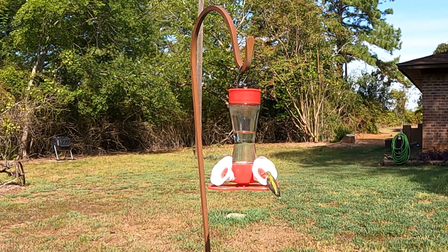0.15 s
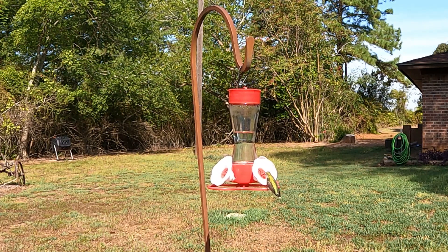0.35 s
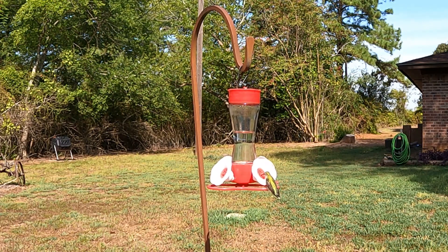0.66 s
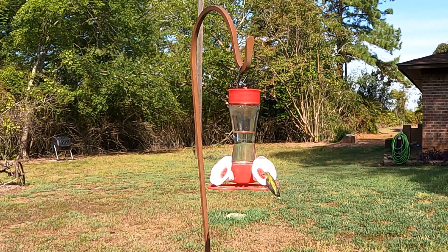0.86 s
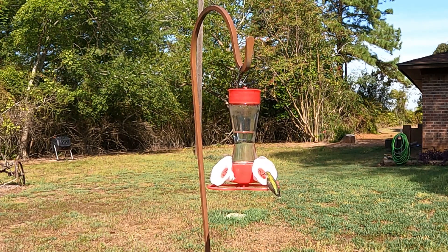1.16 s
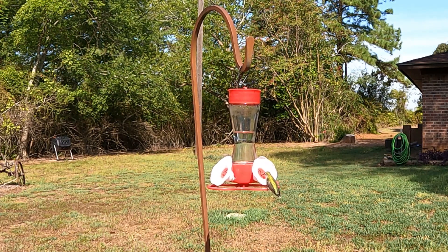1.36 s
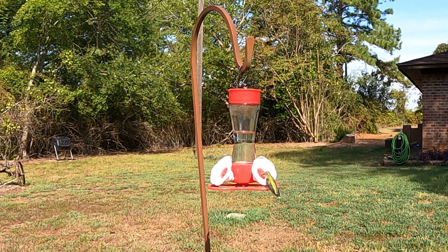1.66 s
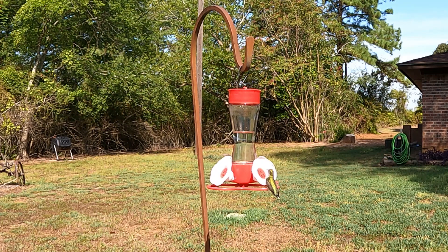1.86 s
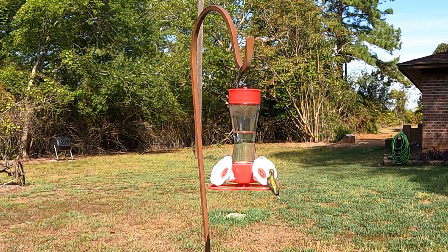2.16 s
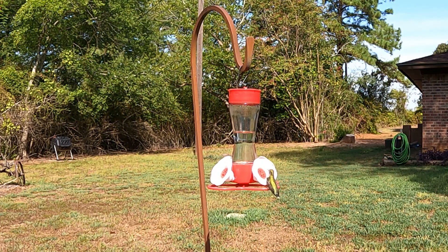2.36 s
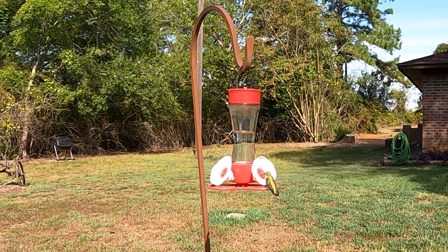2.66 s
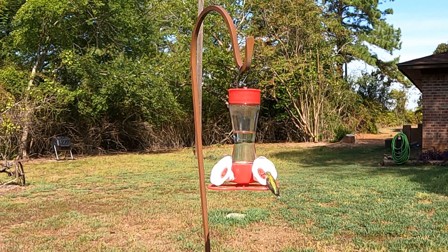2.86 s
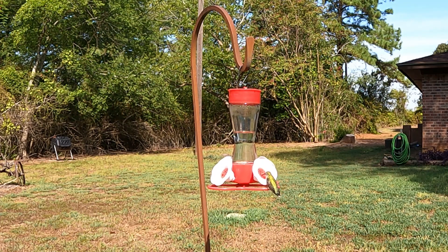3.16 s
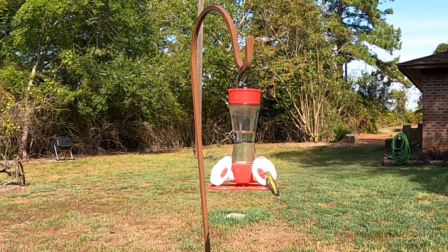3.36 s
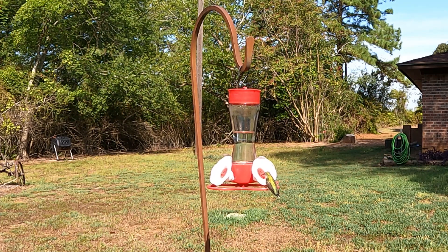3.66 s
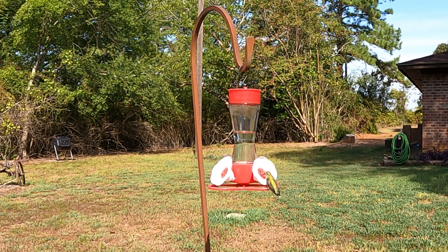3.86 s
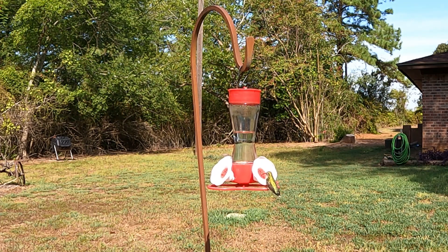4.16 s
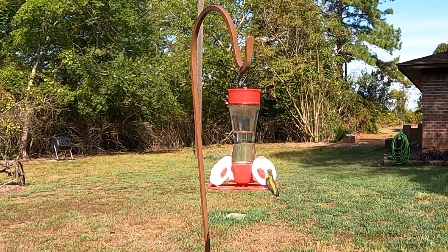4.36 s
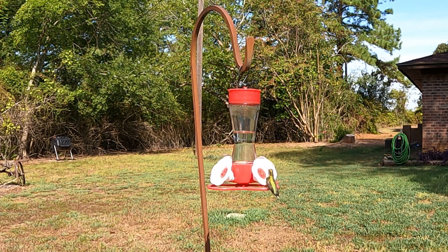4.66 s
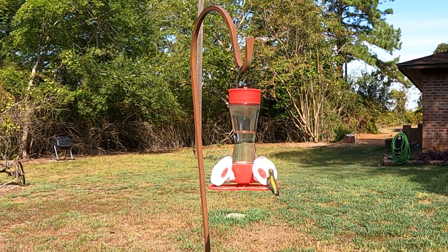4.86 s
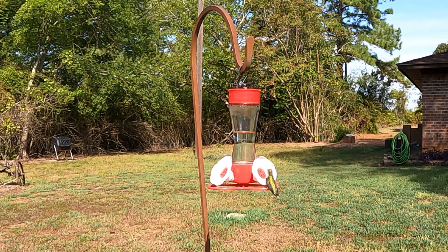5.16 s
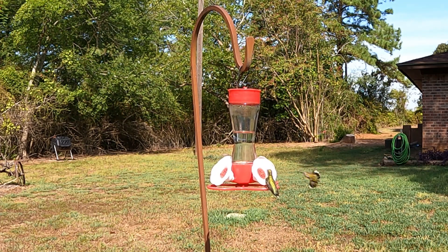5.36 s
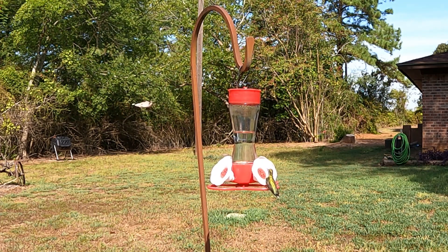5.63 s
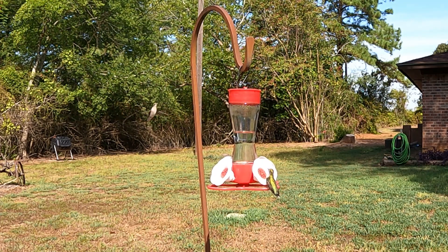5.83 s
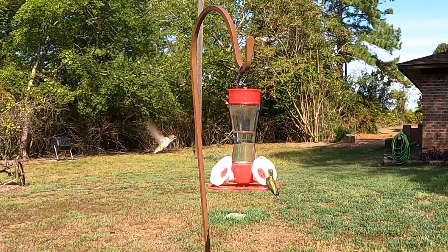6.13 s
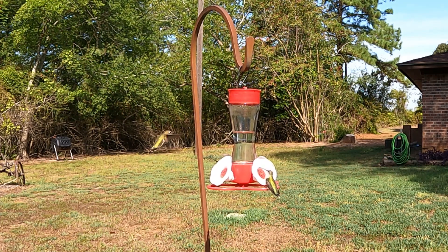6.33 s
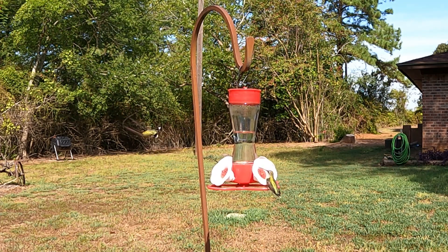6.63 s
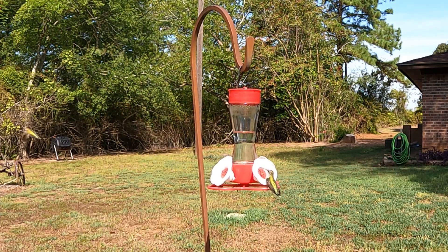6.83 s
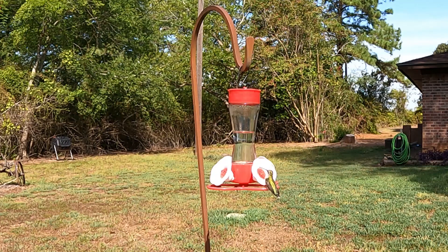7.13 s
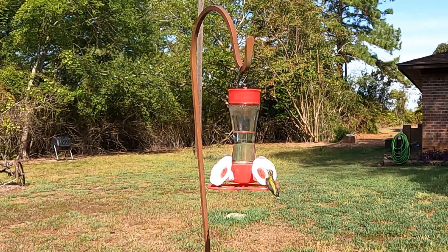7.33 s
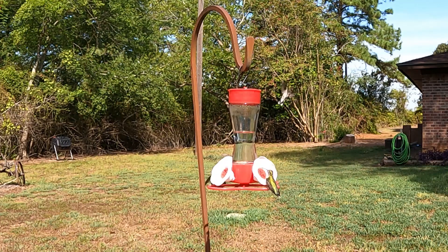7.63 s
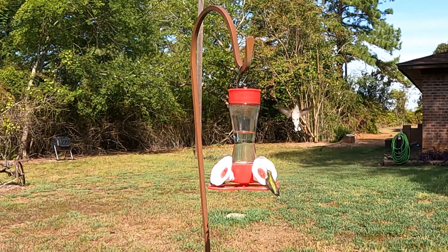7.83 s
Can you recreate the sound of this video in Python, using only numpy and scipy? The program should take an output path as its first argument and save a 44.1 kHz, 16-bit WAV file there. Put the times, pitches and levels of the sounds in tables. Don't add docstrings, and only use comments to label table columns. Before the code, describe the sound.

Breezy yard with distant traffic and steady insect trill, bright paired chirps at left, low wind buffeting, then a hummingbird's fluttering wing hum.

```python
import sys
import numpy as np
from scipy import signal
from scipy.fft import rfft, irfft, next_fast_len
from scipy.io import wavfile
from scipy.ndimage import uniform_filter1d

SR = 44100
rng = np.random.default_rng(int(sys.argv[2]) if len(sys.argv) > 2 else 0)


def undo_db(level):
    steps = np.asarray(level, float) / 20
    return 10 ** steps


def int16_out(signal):
    q = np.round(np.clip(np.atleast_2d(signal).T, -1, 1) * 32767)
    wavfile.write(sys.argv[1], SR, q.astype(np.int16))


N = 352359
TIME = np.arange(N) / SR

# (frequency [Hz], level [dB per Hz])
YARD_SPECTRUM = [(76, -34), (130, -9.5), (150, 2), (199, -4), (247, -7.5), (300, -9.5), (504, -15.5),
                 (602, -12), (635, -16.5), (1230, -11.5), (1650, -21), (2130, -25), (2940, -27.5),
                 (6440, -30), (6920, -30), (9200, -26), (12000, -65), (20200, -120)]
# (frequency [Hz], left-right correlation [-1 to 1])
LIKENESS = [(60, 0.77), (300, 0.42), (1400, 0.47), (3000, 0.012), (7000, 0.18), (12000, 0.98)]
# (time [s], level [dB])
LEAF_LEVEL = [(0.0, -80.5), (1.8, -78), (3.67, -80), (4.05, -74.5), (4.56, -81.5), (5.55, -77),
              (6.4, -79.5), (7.3, -76.5), (7.99, -75)]
# (time [s], level [dB])
CRICKET_LEVEL = [(0, -78), (1.2, -80), (2.5, -76.5), (3.7, -76.5), (4.6, -85), (5.8, -76.5), (7, -80),
                 (7.99, -77.5)]
# (frequency [Hz], level [dB])
ENGINE_PARTIALS = [(67, -6), (98, -10.5), (125, -18), (212, -24.5)]
# (time [s], level [dB])
ENGINE_LEVEL = [(0, -62), (1, -56.5), (2.1, -59.5), (3, -54), (3.9, -52), (4.6, -56), (6, -56), (7.99, -51)]
# (time [s], level [dB])
BREEZE_LEVEL = [(0, -94), (.45, -52), (.6, -55.5), (1.15, -48.5), (1.6, -62.5), (1.9, -65.5), (2.43, -59.5),
                (2.7, -56), (3.05, -49.5), (3.5, -52), (3.87, -47), (4.25, -53.5), (4.32, -62), (5.1, -59),
                (5.38, -48.5), (5.8, -62), (6.1, -47), (6.6, -60.5), ]
# (time [s], peak level [dB], length [s])
GUSTS = [(0, -47.5, 0.025), (.15, -53, 0.12), (.38, -49, 0.055), (.64, -49.5, 0.079), (.91, -40.5, 0.085),
         (1.09, -53, 0.035), (1.67, -54, 0.024), (1.82, -50, 0.02), (2.8, -47.5, 0.053), (3.07, -44, 0.039),
         (3.29, -39, 0.03), (3.4, -46, 0.082), (4.45, -32.5, 0.064), (4.54, -36, 0.024), (4.63, -38, 0.032),
         (4.76, -46.5, 0.046), (4.9, -47.5, 0.16), (5.14, -38.5, 0.026), (5.52, -46, 0.026),
         (5.67, -42.5, 0.085), (6.87, -31.5, 0.042), (6.99, -39, 0.048), (7.06, -46, 0.06),
         (7.18, -33, 0.06), (7.3, -35, 0.13), (7.41, -41.5, 0.077), (7.58, -63, 0.34), (7.77, -40, 0.26),
         (7.87, -37.5, 0.052), (7.97, -39.5, 0.11)]
# (time [s], peak level [dB], length [s])
RATTLES = [
    (7.195, -30, 0.027),
    (7.262, -40, 0.075),
]
# (time [s], strokes so far [count])
KATYDID_STROKES = [(0.0, 0.82), (2.022, 145.91), (4.981, 357.87), (6.461, 463.66), (8.0, 573.86)]
# (time [s], level [dB])
KATYDID_LEVEL = [(0.0, -66), (2.7, -66), (4.6, -67.5), (5.8, -66.5), (6.6, -67.5), (7.99, -67.5)]
# (time [s], level [dB], start pitch [Hz], upper voice [dB], length [s])
CHIRPS = [(0.306, -42.5, 6010, -4.5, 0.059), (0.4045, -38, 6370, -11, 0.065),
          (1.491, -47, 6050, -0.5, 0.061), (1.5787, -39.5, 6020, -4, 0.054),
          (1.7034, -40.5, 6170, -4, 0.055), (3.072, -49, 6360, -16, 0.078),
          (3.187, -46.5, 6540, -20, 0.076), (3.945, -49, 6270, -6, 0.067), (4.055, -43.5, 6540, -10, 0.058),
          (5.153, -41.5, 6100, -14, 0.053), (5.277, -42.5, 6450, -21, 0.034),
          (6.514, -47.5, 5760, -2.5, 0.057), (6.614, -46.5, 6000, -2, 0.049)]
# (top pitch [Hz], attack [share of length], climb [share of length], closing dive [dB])
CHIRP_MANNER = [(7210, 0.13, .85, -12), (7230, 0.034, 0.63, -20), (7080, 0.21, 0.82, -7),
                (7136, 0.11, .8, -11), (7070, 0.051, .85, -13), (7350, 0.071, 0.6, -32),
                (7200, 0.11, 0.496, -28), (7270, 0.32, .8, -30), (7100, .04, .75, -14),
                (7200, 0.32, .85, -22), (7220, 0.091, 0.88, -24), (7150, 0.42, .9, -13),
                (7000, 0.27, .89, -20)]
# (delay [s], level [dB])
REFLECTIONS = [(.012, 10.5), (.03, 3.5), (0.05, -15), (.1, -13), (0.15, -10)]
# (time [s], length [s], level [dB], start pitch [Hz])
WHISTLES = [
    (2.232, 0.092, -60.5, 6785),
    (2.632, 0.06, -61.5, 6570),
]
# (time [s], length [s], level [dB], start pitch [Hz], stroke rate [1/s])
BUZZES = [
    (.645, 0.12, -63, 6950, 88),
    (2.733, 0.085, -60.5, 6510, 65.5),
]
# (time [s], level [dB], low voice [dB], length [s], rasp [0-1])
SCOLDS = [(0.8105, -60.5, -65.5, 0.043, 0.83), (0.94, -58.5, -74.5, 0.027, 0.21),
          (1.022, -59.5, -75, 0.031, 0.36), (1.124, -60, -76, 0.026, 0.3), (1.284, -63, -82, 0.022, .3),
          (2.692, -65, -82, 0.016, 0.26), (2.81, -69, -73, 0.016, 0.5), (2.904, -57.5, -59.5, 0.035, 0.92),
          (3.058, -57, -71, 0.02, 0.13), (3.163, -59, -69, 0.025, 0.15), (3.846, -71, -92, 0.1, 0.9)]
# (time [s], length [s], level [dB])
THIN_WHISTLES = [(2.15, 0.22, -78.5), (2.8, 0.46, -75), (4.98, .27, -76.5), (6.12, 0.35, -79.5),
                 (7.15, 0.26, -76), (7.83, 0.12, -80)]
# (time [s], length [s], second harmonic [dB], crest [share of length], fundamental [dB])
SCREAMS = [
    (1.41, 0.39, -70.5, 0.59, -75),
    (3.755, .41, -68, 0.52, -76),
    (7.06, .46, -65.5, 0.21, -80.5),
]
# (time [s], length [s], level [dB], pitch [Hz])
TWITTER = [(4.85, .1, -96, 3300), (5.11, .12, -95, 3400), (5.4, .08, -98, 3250)]
# (time [s], beat rate [Hz], upper hum [dB], lower hum [dB], third harmonic lift [dB])
WING_FLIGHT = [
    [(5.45, 51.4, -74, -65, 0), (5.514, 51.14, -55.5, -44.5, -1), (5.564, 52.15, -51.5, -48, -9),
     (5.628, 52, -54.5, -49, -10), (5.672, 52, -57, -52.5, 0), (5.726, 51.7, -56, -48, 5),
     (5.872, 51.4, -73.5, -56.5, 7), (5.904, 50.66, -66, -55, 7), (5.96, 51.05, -67, -57, 0)],
    [(5.96, 51.16, -71, -59, -6), (6.034, 47.06, -61.5, -56, 0), (6.07, 49.2, -61.5, -45, -6),
     (6.108, 49.1, -62, -53.5, -3), (6.202, 48.7, -62, -50, 5.5), (6.244, 50.45, -54, -48, -6),
     (6.272, 49.87, -53.5, -43.5, -10), (6.338, 46.3, -70.5, -47, 9), (6.42, 43.1, -77, -65, -2)],
    [(6.42, 42.9, -75, -61, 0), (6.51, 45.4, -78, -53, 3), (6.59, 44.2, -78, -59, 3),
     (6.652, 48, -72, -56, 0), (6.69, 50.54, -56.5, -43, -8), (6.802, 45.24, -67, -50, -5),
     (6.968, 46.9, -80, -55, -2), (7.002, 47.7, -74, -47, 10.5), (7.05, 50.6, -63, -65, -2)],
    [(7.4, 50.8, -74, -63, 0), (7.44, 50.16, -68, -54, 0), (7.488, 52.2, -57, -49, 7),
     (7.594, 49.5, -56, -48.5, 1.5), (7.694, 52.46, -49.5, -43.5, 5.5), (7.872, 51.4, -50.5, -43.5, -1),
     (7.896, 52.5, -47.5, -36.5, 2.5), (7.928, 52.7, -50, -46.5, 0), (7.99, 51.15, -55.5, -41, -0.5)],
]
FEATHER_LEVEL = [-68, -63.5, -63, -80]
# (frequency [Hz], level [dB])
HUM_SPECTRUM = [(50, -38), (100, -45), (150, -0.5), (200, 2), (260, -6.5), (310, 4.5), (420, -5.5),
                (530, -3), (600, -21.5), (700, -13.5)]
# (frequency [Hz], level [dB per Hz])
SWISH_SPECTRUM = [(210, -8), (350, 2.5), (492, -3), (729, -17), (1270, -4.5), (3820, -17), (6580, -17.5),
                  (7540, -21), (9000, -31.5), (11700, -64), (19800, -120)]
# (time [s], peak level [dB], length [s])
FACING = [(5.56, -50.5, 0.095), (5.76, -52, 0.046), (6.08, -46.5, 0.05), (6.28, -54, .06)]
# (frequency [Hz], level [dB])
CONVERTER_RESPONSE = [(11200, -3), (11600, -12), (12400, -15), (13000, -8), (13500, -7.5), (14200, -15),
                      (14450, -32), (14600, -70)]


def colour(x, points):
    hz, db = np.transpose(points)
    size = next_fast_len(x.shape[-1])
    gain = undo_db(np.interp(np.log(np.arange(size // 2 + 1) * SR / size + 1), np.log(hz), db))
    return irfft(rfft(x, size) * gain, size)[..., :x.shape[-1]]


def unit(x):
    return x / np.sqrt(np.mean(x ** 2))


def band(lo_hz, hi_hz, channels=1):
    skirts = [(lo_hz * .3, -90), (lo_hz * .8, -25), (lo_hz, 0),
              (hi_hz, 0), (hi_hz * 1.25, -25), (hi_hz * 3, -90)]
    return unit(colour(rng.standard_normal((channels, N)), skirts))


def band_limit(x, hz):
    return colour(x, [(hz, 0), (hz * 2, -40), (hz * 4, -90)])


def walk(rate):
    k = int(SR / rate)
    held = np.repeat(rng.standard_normal(N // k + 1), k)
    return unit(uniform_filter1d(uniform_filter1d(held, k), k)[:N])


def tone(hz):
    return np.sqrt(2) * np.sin(2 * np.pi * np.cumsum(hz) / SR)


def follow(points):
    return np.interp(TIME, *np.transpose(points))


def soft(gate, fade):
    return uniform_filter1d(1. * gate, int(fade * SR))


def arch(share, crest, edge_db):
    return edge_db * np.where(share < crest, 1 - share / crest, (share - crest) / (1 - crest)) ** 2


def calls(rows):
    start, length, *columns = np.transpose(rows)
    k = np.clip(np.searchsorted(start, TIME) - 1, 0, None)
    age = np.clip(TIME - start[k], 0, None)
    gate = (TIME >= start[k]) & (age < length[k])
    return gate, age, np.minimum(age / length[k], 1), *(c[k] for c in columns)


def swells(rows, rise):
    energy = np.zeros(N)
    for s, db, length in rows:
        part = slice(max(int((s - 4 * length) * SR), 0), int((s + 4 * length) * SR))
        late = (TIME[part] - s) / length
        energy[part] += undo_db(db - 12 * np.maximum(late, -late / rise)) ** 2
    return np.sqrt(energy)


def add(out, s, x):
    i = int(s * SR)
    out[i:i + len(x)] += x[:len(out) - i]


def place(x, pan_db, lag=0):
    return np.array([x * undo_db(pan_db / 2), np.roll(x, lag) * undo_db(-pan_db / 2)])


def yard():
    hz, like = np.transpose(LIKENESS)
    ratio_db = 10 * np.log10((1 - np.clip(like, 0, .99)) / (1 + like))
    middle, side = rng.standard_normal((2, N))
    side = colour(side, np.transpose([hz, ratio_db]))
    spectrum = [(40, -31), (66, -6), (82, -2), (98, -10)] + YARD_SPECTRUM[1:-2]
    spectrum = spectrum + [(11000, -28.0), (12500, -28.5)]
    bed = colour(np.array([middle + side, middle - side]), spectrum)
    above_rumble = colour(bed.mean(axis=0), [(290, -60), (300, 0)])
    bed *= undo_db(-70) / np.sqrt(np.mean(above_rumble ** 2))
    leaves = colour(bed, [(1500, -30), (2500, 0), (6000, 0), (8000, -30)])
    traffic = (bed - leaves) * undo_db(1.08 * walk(1.206))
    rustle_db = follow(LEAF_LEVEL)
    leaves = leaves * undo_db(rustle_db - np.median(rustle_db))
    crickets = colour(band(7590, 7600, channels=2), [(7200, -5.0), (7600, -0.5), (7800, -1.5), (8100, -14)])
    crickets = crickets * undo_db(follow(CRICKET_LEVEL) + 2.9 * walk(5.5))
    machine = undo_db(-85.0 + 0.24 * walk(4.2)) * tone(np.full(N, 600.))
    engine = sum(undo_db(db + 4 * walk(26)) * tone(hz * (1 + .012 * walk(14))) for hz, db in ENGINE_PARTIALS)
    engine = place(engine * undo_db(follow(ENGINE_LEVEL)), 0.57)
    return traffic + leaves + crickets + machine + engine


def eddies(lo_hz, hi_hz, apart, span=.05):
    air = band(lo_hz, hi_hz, channels=3)
    ports = air[0] + apart * air[1] * np.array([[1], [-1]]) + 0.18 * air[2]
    strength = np.sqrt(uniform_filter1d(ports.mean(axis=0) ** 2, int(span * SR)) + .05)
    return band_limit(ports / strength, hi_hz)


def wind():
    gust = np.hypot(undo_db(follow(BREEZE_LEVEL)), swells(GUSTS, rise=0.78))
    deep = np.clip(undo_db(-2 + 0.59 * walk(8.7)) * (gust / undo_db(-39)) ** 0.036, 0, .95)
    surge = deep * eddies(17.2, 40.8, apart=0.42, span=0.022)
    thuds = np.sqrt(1 - deep ** 2) * undo_db(-1.5) * eddies(46.2, 84.9, apart=0.11, span=0.03)
    skirt = undo_db(-22 + 1.2 * walk(4.4)) * eddies(70, 225, apart=0.45, span=0.18)
    pan_db = -2 + 0.98 * walk(3.1)
    pan = undo_db(np.array([pan_db, -pan_db]) / 2)
    buffeting = band_limit((surge + thuds + skirt) * gust * pan, 290)
    rattle = unit(colour(eddies(67, 417, apart=1.0, span=0.04), [(100, 5.5), (280, -8.5), (420, -22.5)]))
    return buffeting + swells(RATTLES, rise=0.67) * rattle


def katydid():
    start, fastest, end = .14, .5, .86
    top_hz, start_hz, end_hz = 10820, 10330, 9750
    cycle = follow(KATYDID_STROKES) + .5
    chance = rng.standard_normal((600, 2))[cycle.astype(int)]
    share = np.clip(cycle % 1, start, end)
    speeding_up = (top_hz - start_hz) * ((fastest - share) / (fastest - start)) ** 2
    slowing = (top_hz - end_hz) * ((share - fastest) / (end - fastest)) ** 2
    hz = top_hz - np.where(share < fastest, speeding_up, slowing)
    grip = np.minimum(np.minimum((share - start) / .12, (end - share) / .07), 1)
    dip = 1 - .22 * np.exp(-((share - fastest) / .1) ** 2)
    level = grip * dip * undo_db(.6 * chance[:, 0] + .8 * walk(300))
    song = unit(level * tone(hz + 30 * chance[:, 1])) * undo_db(follow(KATYDID_LEVEL))
    return place(song, 0.16) + .17 * np.gradient(song) * np.array([[1], [-1]])


def chirps():
    out, waver, flutter = np.zeros(N), walk(600), walk(240)
    for (s, db, start_hz, upper_db, length), (top_hz, attack, climb, dive_db) in zip(CHIRPS, CHIRP_MANNER):
        hoarse = .45 if 3 < s < 4 else .2
        u = np.arange(int(1.2 * length * SR)) / (length * SR)
        part = slice(int(s * SR), int(s * SR) + len(u))
        still_to_climb = np.clip(1 - u / climb, 0, 1) ** 1.845
        hz = top_hz - (top_hz - start_hz) * still_to_climb - 16000 * np.clip(u - .98, 0, 1)
        hz = hz + 330 * hoarse * waver[part]
        shape = np.interp(u, [0, min(attack, .34), .35, .75, .92, 1.0, 1.08, 1.14],
                          [0, .8, .65, 1, .7, undo_db(dive_db), undo_db(dive_db - 13), 0])
        swell = np.interp(u, [0, .4, .85, 1.0], [.25, .7, 1.1, 0])
        upper = swell * undo_db(upper_db) * (tone(hz + 650) + .06 * swell * tone(hz + 1300))
        throb = undo_db(db - 9 + (2 + 4 * hoarse) * flutter[part])
        add(out, s, throb * shape * (tone(hz) + upper))
    return place(out, 4.1)


def yard_echo(x, tail_db, t60, echo_db):
    t = np.arange(int(.9 * SR)) / SR
    scatter = rng.standard_normal((3, len(t))) * (1 - np.exp(-t / 0.007)) * undo_db(-60 * t / t60)
    response = (scatter[0] + 0.4 * scatter[1:]) * undo_db(tail_db) / np.sqrt(np.sum(scatter[0] ** 2))
    for s, db in REFLECTIONS:
        response[:, int(s * SR)] += undo_db(db + echo_db)
    return signal.fftconvolve(x, response, axes=1)[:, :N]


def buzz():
    gate, age, share, db, hz, rate = calls(BUZZES)
    gate = soft(gate, .003)
    db = db + arch(share, 0.33, -10.5)
    stroke = (age * rate + .05 * walk(50)) % 1
    dive = np.clip(stroke / .3, 0, 1)
    hz = hz - 470 * share + 70 * walk(300)
    held = (1 - 0.37 * stroke) * tone(hz)
    click = undo_db(-4) * soft(dive < 1, 0.00091) * undo_db(3.4 * walk(500)) * tone(hz - 1150 * dive + 200 * walk(700))
    smear = undo_db(db - 11) * np.minimum(3 * share, 1) * band(6200, 5500)[0]
    return gate * (undo_db(db - 4 + 1.7 * walk(200)) * (held + click) + smear)


def whistle():
    gate, _, share, db, hz = calls(WHISTLES)
    return soft(gate, .003) * undo_db(db + arch(share, 0.26, -7.0)) * tone(hz - 326 * share ** 2)


def scolds():
    out = np.zeros(N)
    high, middle, rough = band(7030, 8000)[0], band(5300, 7500)[0], band(100, 870)[0]
    waver = walk(400)
    for s, db, low_db, length, rasp in SCOLDS:
        u = np.arange(int(2.5 * length * SR)) / (length * SR)
        part = slice(int(s * SR), int(s * SR) + len(u))
        shape = np.minimum(u / (.06 + .4 * rasp), 1) * np.exp(-u ** 3)
        hz = 3050 + 1200 * rasp - (1300 + 200 * rasp) * np.minimum(u, 1.3)
        hiss = np.sqrt(rasp) * (high[part] + 0.66 * middle[part])
        overtones = .5 * rough[part] * tone(2 * hz) + 0.42 * tone(2.9 * hz - 300 * u)
        high_voice = hiss + (1 - rasp) * np.exp(-u / .5) * overtones
        roughness = 1.1 * (1 - rasp) + .7 * rasp * rough[part] + .3
        low_voice = tone(hz + 250 * waver[part]) * roughness
        add(out, s, shape * (undo_db(db - 6) * high_voice + undo_db(low_db - 4) * low_voice))
    return out


def second_bird():
    out = buzz() + scolds() + whistle()
    add(out, 7.4, undo_db(-61) * band(3000, 7000)[0, :120] * np.hanning(120))
    return place(out, 0.88)


def screams():
    gate, age, share, db, crest, low_db = calls(SCREAMS)
    scoop = 175.7 * np.exp(-3 * age / 0.074)
    sag = 298.7 / (1 + np.exp((.55 - share) / .13))
    side_db = -22 + 14 * share
    hoarse_hz = (10 + 330 * share * np.clip(undo_db(side_db), 0, .4)) * walk(150)
    hz = 3194 - scoop - sag + hoarse_hz
    scream = tone(hz) + undo_db(side_db + 3) * tone(hz * (1.27 - 0.081 * share))
    scream *= undo_db(db + arch(share, crest, -11))
    fundamental = tone(hz / 2 + 20 * walk(90))
    scream += undo_db(low_db - 2 + 2 * walk(40) + arch(share, .15, -16)) * fundamental
    direct = place(soft(gate, 0.03) * scream * undo_db(-0.5 + 0.63 * walk(110)), 6.1, lag=4)
    woods = undo_db(-11.5) * undo_db(1.2 * walk(60)) * np.roll(direct, int(.16 * SR), axis=1)
    return direct + woods * np.array([[1], [-1]])


def thin_whistles():
    gate, age, share, db = calls(THIN_WHISTLES)
    hz = 8100 - 495 * np.clip(1 - age / 0.12, 0, 1) ** 2 - 76.8 * share
    level_db = db - 4.5 + 3.3 * walk(70) + arch(share, .4, -6)
    thin = soft(gate, 0.026) * undo_db(level_db) * tone(hz + 130 * walk(160))
    gate, _, share, db, hz = calls(TWITTER)
    thin += soft(gate, .02) * undo_db(db + 3 * walk(30)) * tone(hz - 150 * share + 160 * walk(120))
    return place(thin, 0.54)


def flight():
    gate = sum((TIME >= rows[0][0]) & (TIME < rows[-1][0]) for rows in WING_FLIGHT)
    s, *columns = np.transpose(np.concatenate(WING_FLIGHT))
    return soft(gate, 0.05), *(np.interp(TIME, s, c) for c in columns)


def wings():
    gate, hz, high_db, low_db, third_db = flight()
    stretch = np.searchsorted([rows[0][0] for rows in WING_FLIGHT[1:]], TIME)
    effort_db = np.roll(high_db, int(0.011 * SR)) + 51.5
    swish_db = np.array(FEATHER_LEVEL)[stretch] + 0.87 * effort_db
    phase = np.cumsum(hz + .9 * walk(45)) / SR
    hum = np.zeros(N)
    for k in range(1, 14):
        db = np.interp(k * hz, *np.transpose(HUM_SPECTRUM))
        db = db + np.where(k * hz < 280, low_db + 2, high_db) + (k == 3) * third_db + 1.8 * walk(16)
        hum += undo_db(db - 11.5) * np.cos(2 * np.pi * k * phase - 0.42 * k)
    hum += swells(FACING, rise=0.82) * np.sqrt(2) * np.cos(4 * np.pi * phase)
    down_and_up = np.exp(-(phase % 1) / .1) + .45 * np.exp(-((phase + .55) % 1) / .12)
    strokes = .34 + undo_db(2 * walk(60)) * down_and_up
    air = rng.standard_normal((3, N))
    swish = unit(colour(air[0] + .5 * air[1:], SWISH_SPECTRUM[:-2] + [(12000, -9.0)]) * strokes)
    return gate * (place(hum, -1.5, lag=6) + undo_db(swish_db + 11.5) * swish)


def scene():
    out = yard() + wind()
    insect = katydid()
    out += insect + yard_echo(insect, tail_db=-13, t60=.15, echo_db=-30)
    near = chirps()
    facing = colour(near, [(6000, -8), (7100, 0)])
    out += near + yard_echo(facing, tail_db=-1.5, t60=0.43, echo_db=-18.5)
    second = second_bird()
    out += second + yard_echo(second, tail_db=-8, t60=.4, echo_db=-13)
    far = screams() + thin_whistles()
    out += far + yard_echo(far, tail_db=1.0, t60=0.69, echo_db=-21)
    return out + wings()


def top_cut(x):
    return signal.sosfilt(signal.butter(12, 15540, fs=SR, output="sos"), x)


def record(dry):
    mirror_hz = 24000
    kept = colour(dry, [(mirror_hz / 2 - 50, 0), (mirror_hz / 2, -80)])
    analytic = signal.hilbert(kept, next_fast_len(N))[:, :N]
    mirror = np.real(np.conj(analytic) * np.exp(2j * np.pi * mirror_hz * TIME))
    response = [(3300, 6.05), (3900, 3.3), (4600, 7.83), (10500, 5.25)] + CONVERTER_RESPONSE
    mix = colour(kept + mirror, response)
    return top_cut(mix)


dry = scene()
out = record(dry)
int16_out(out)
```